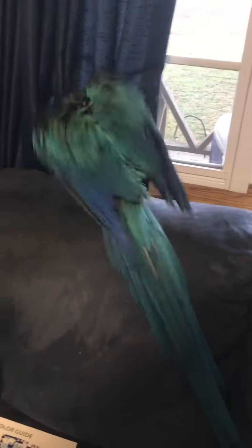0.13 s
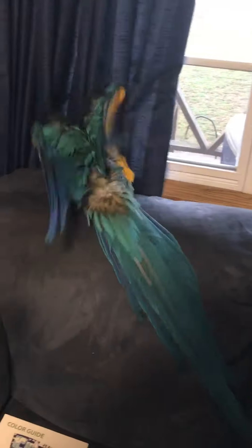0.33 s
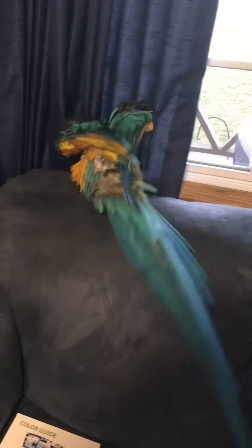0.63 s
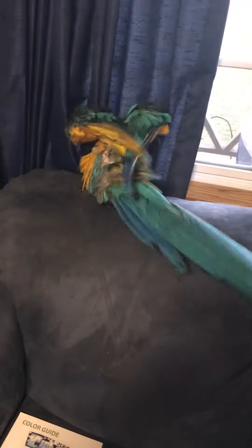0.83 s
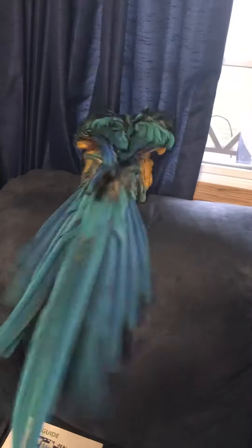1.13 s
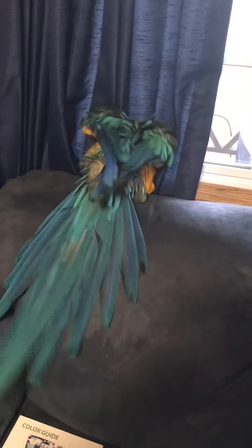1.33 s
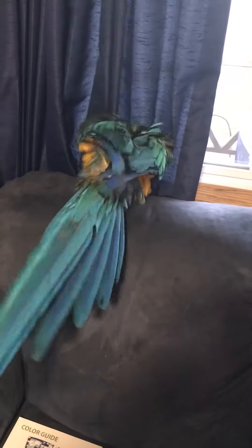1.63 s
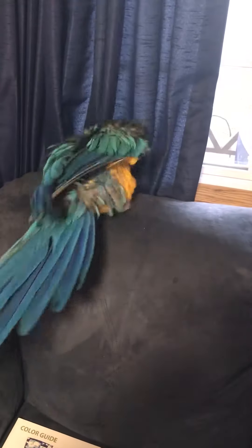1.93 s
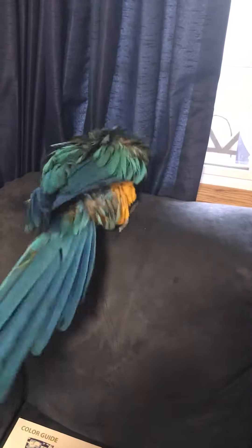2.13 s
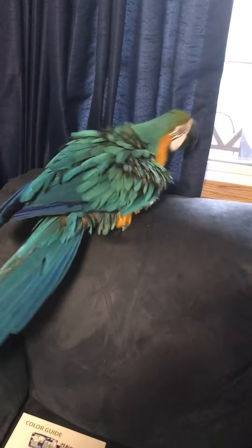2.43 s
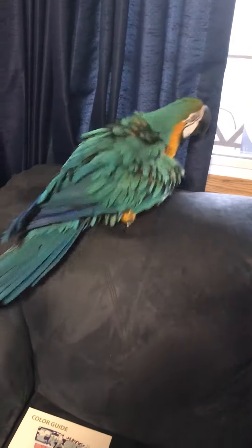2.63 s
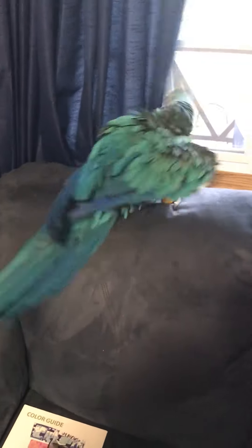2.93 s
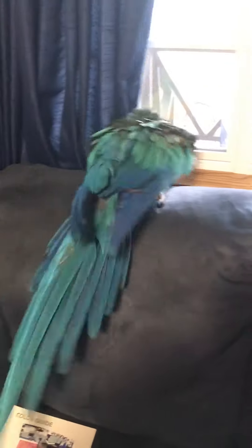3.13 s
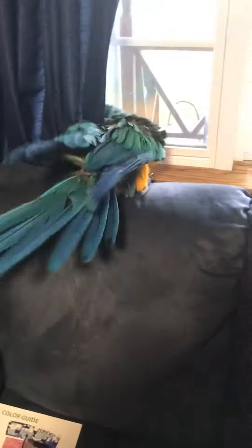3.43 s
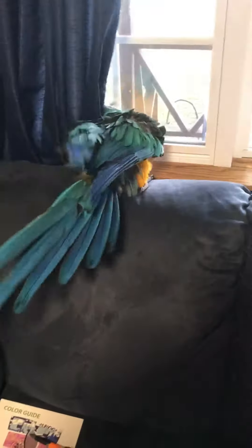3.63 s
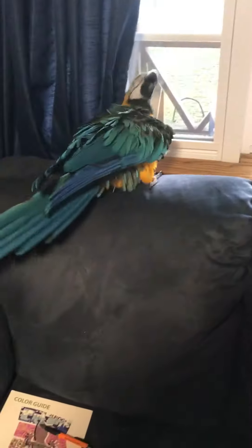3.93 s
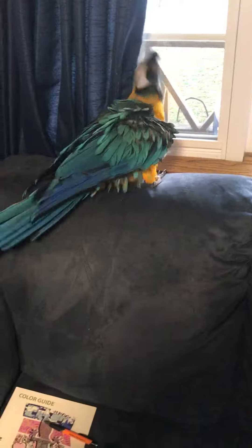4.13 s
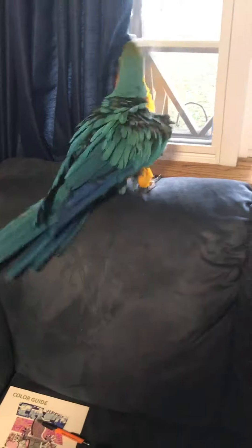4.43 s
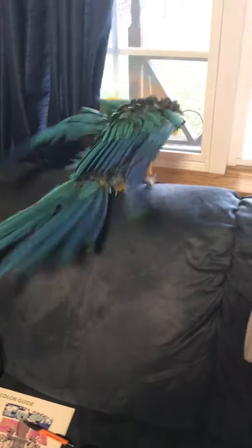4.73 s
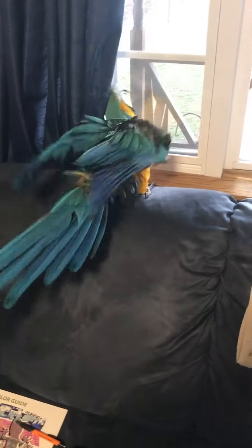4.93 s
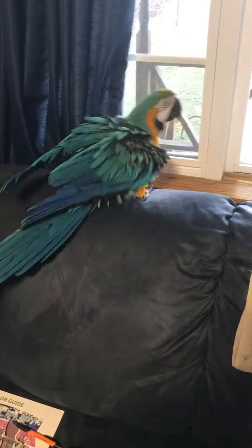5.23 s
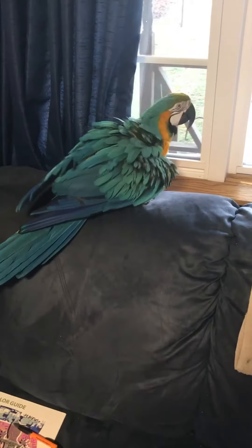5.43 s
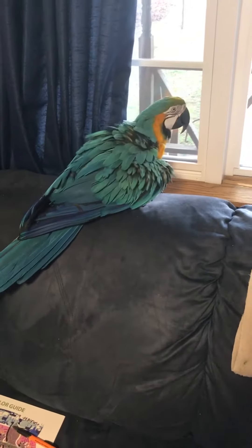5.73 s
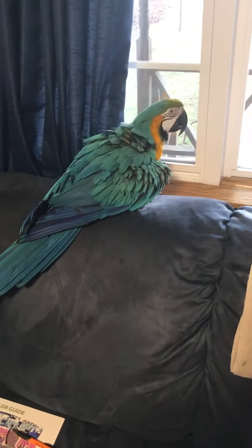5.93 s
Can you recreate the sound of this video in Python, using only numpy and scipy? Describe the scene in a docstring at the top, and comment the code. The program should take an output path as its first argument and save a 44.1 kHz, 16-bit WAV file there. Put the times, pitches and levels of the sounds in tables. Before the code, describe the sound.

A large parrot croaks harshly twice, rustles its feathers, croaks briefly again, and knocks hard on a leather sofa in a quiet living room.

```python
"""A large parrot croaks harshly, twice early and once later, over low room hush and brushing feathers.
It shuffles along the back of a leather sofa in a quiet living room, near a phone.
Hush and feathers are shaped noise; the croak is rough pulses and puffs sent through moving resonances.
Feet, beak and claws knock on the sofa as bursts of decaying modes; soft echoes follow voice and knocks."""
import sys
import numpy as np
from scipy import signal
from scipy.io import wavfile
from scipy.ndimage import uniform_filter1d

SR = 44100
rng = np.random.default_rng(int(sys.argv[2]) if len(sys.argv) > 2 else 0)


def store_pcm(level_fs):
    """Save levels as 16-bit WAV."""
    pcm = np.round(np.clip(level_fs, -1, 1) * 32767).astype(np.int16)
    wavfile.write(sys.argv[1], SR, np.atleast_2d(pcm).T)


def gain_from_db(level_db):
    """Turn a decibel level (scalar or array-like) into a linear amplitude factor."""
    decades = np.asarray(level_db, float) / 20
    return 10 ** decades


N = 268833

# Spectrum of the steady hush. Each row: frequency in Hz, relative density in dB per Hz.
HUSH_SPECTRUM = [(20, -9), (49, -1), (116, -14), (200, -14), (280, -18), (420, -19), (600, -22),
                 (1000, -23), (1400, -24), (2000, -26), (5950, -25.5), (7800, -31), (9000, -29.5),
                 (13700, -33), (15700, -36)]
# Spectrum of the brushing. Each row: frequency in Hz, relative density in dB per Hz.
BRUSH_SPECTRUM = [(150, -24), (400, -13), (1000, -8), (2500, -4), (3500, -1), (6300, -1), (7700, -8),
                  (9000, -5), (10500, -9), (12500, -6), (14800, -10), (16000, -13)]
# Strokes of feathers and claws. Each row: peak time in seconds, peak level in dB, time to rise 10 dB
# in seconds, time to fall 10 dB in seconds, brightness (lift of the top treble) in dB.
STROKES = [(0.067, -58.8, 0.105, 0.243, -0.2), (0.191, -49.2, 0.061, 0.342, -2.5),
           (0.295, -44.6, 0.013, 0.028, -3.5), (0.379, -45.3, 0.093, 0.04, -3.0),
           (0.467, -45.5, 0.062, 0.058, 1.3), (0.647, -54.3, 0.081, 0.116, -1.4),
           (0.998, -55.9, 0.079, 0.029, -2.1), (1.054, -51.9, 0.022, 0.084, 1.2),
           (1.126, -44.3, 0.041, 0.058, -1.3), (1.276, -53.9, 0.062, 0.101, -0.7),
           (1.478, -49.9, 0.163, 0.031, -2.1), (1.581, -52.9, 0.057, 0.078, -0.3),
           (1.831, -59.0, 0.119, 0.035, -3.8), (1.959, -58.3, 0.078, 0.05, -0.7),
           (2.022, -60.4, 0.011, 0.138, -1.6), (2.258, -66.9, 0.273, 0.091, -1.2),
           (2.529, -66.1, 0.008, 0.109, -3.8), (2.791, -68.2, 0.037, 0.017, -1.7),
           (2.913, -53.0, 0.031, 0.079, 0.2), (3.048, -50.3, 0.068, 0.088, -0.9),
           (3.144, -54.0, 0.052, 0.106, -2.2), (3.248, -56.2, 0.102, 0.111, -3.0),
           (3.468, -54.5, 0.094, 0.069, -1.9), (3.561, -56.6, 0.067, 0.078, -2.3),
           (3.837, -65.6, 0.198, 0.034, -0.8), (3.936, -62.6, 0.009, 0.037, -5.0),
           (4.061, -60.6, 0.008, 0.22, -8.0), (4.15, -56.0, 0.009, 0.062, -2.7),
           (4.399, -51.2, 0.086, 0.052, -1.2), (4.535, -59.0, 0.103, 0.009, -3.1),
           (4.63, -59.4, 0.1, 0.047, 2.3), (4.759, -52.2, 0.083, 0.092, -1.6),
           (4.867, -59.3, 0.166, 0.019, -1.8), (4.975, -59.5, 0.111, 0.021, 0.1)]
# Gestures of the three calls, one list per call. Each row: time in seconds, effort in dB,
# pitch in Hz, windpipe resonance in Hz, beak opening from 0 to 1.
CALL_SHAPES = [
    [(.016, -66, 289, 920, 0), (.028, -62.5, 298.6, 930, 0), (.043, -50, 310, 950, 0.55),
     (.048, -44, 318.3, 957, 0.66), (.068, -39.5, 311, 904, 0.85), (.08, -45, 402, 890, 0.75),
     (.102, -44.5, 407, 890, 0.6), (.128, -52, 400, 930, 0.7), (.155, -81, 352, 910, 0.9)],
    [(.165, -57, 400.7, 1055, 0.97), (.177, -44, 405.2, 1050, 0.56), (.187, -37.5, 415, 980, 0.53),
     (.2, -34.5, 400.7, 1130, 0.46), (.222, -36, 407.6, 1080, 0.57), (.245, -40, 387.2, 950, 0.53),
     (.266, -34.5, 387.8, 970, 0.51), (.28, -38.5, 400, 1090, 0.62), (.302, -37, 435, 970, 0.15),
     (.328, -40.5, 395.4, 884, 0.44), (.336, -40.5, 287.3, 990, 0.53), (.375, -48, 282.7, 895, 0.55),
     (.388, -51.5, 277.2, 810, 0.77), (.403, -40, 290, 810, 0.64), (.414, -63, 279, 860, 0.3),
     (.45, -66, 280, 850, 0.1)],
    [(2.919, -40, 245.3, 1070, 0.7), (2.931, -42, 240.6, 1020, 0.89), (2.940, -37, 241, 1150, 0.72),
     (2.952, -40.5, 252.5, 1100, 0.45), (2.96, -54, 288, 1070, 0.75), (2.975, -58, 292, 1100, 0.4)],
]
# Voice of each call. Each row: base level of the fundamental over the windpipe in dB,
# gap from the beak resonance down to its partner in Hz, partner level in dB.
CALL_VOICES = [(8, 585, -3.5), (-1, 500, -2), (6.5, 650, -10.5)]
# The voice breaks up and clears again. Each row: time in seconds, roughness from 0 to 1.
ROUGHNESS = [(.02, .25), (.045, .35), (.055, .65), (.075, .6), (.1, .5), (.18, .5), (.195, .35),
             (.228, .35), (.24, .65), (.26, .62), (.28, .5), (.3, .4), (.328, .4), (.338, .5), (.44, .6),
             (2.92, .7), (2.94, .6), (2.95, .45), (3, .5)]
# The beak resonance glides with the tongue. Each row: time in seconds, resonance in Hz.
BEAK_GLIDE = [(.04, 2450), (.065, 2070), (.088, 2280), (.11, 2130), (.15, 2330), (.17, 2510), (.182, 2440),
              (.195, 2050), (.225, 2150), (.26, 2260), (.31, 2270), (.34, 2120), (.41, 1910), (2.92, 2200),
              (2.935, 2320), (2.942, 2730), (2.955, 2370), (2.98, 2380)]
# Modes of the sofa frame and cushion, before each blow varies them.
# Each row: frequency in Hz, relative level in dB, base time to decay 60 dB in seconds.
SOFA_MODES = [(206, 5.5, 0.041), (243, 1.5, 0.24), (293.6, 7.5, 0.092), (352, -6, 0.14), (394, -5.5, 0.036),
              (457, -2, 0.038), (604.4, -0.5, 0.088), (720, 8, 0.065), (830, 2, 0.067), (950, 5, 0.078),
              (1070, -1, 0.087), (1200, 12.5, 0.019), (1390, 2, 0.05), (1585, -3.5, 0.064),
              (1750, 8.5, 0.017), (2280, 7, 0.019), (2880, 4, 0.027)]
# Deep thump modes of the cushion, before each blow detunes them.
# Each row: frequency in Hz, relative level in dB, time to decay 60 dB in seconds.
CUSHION_MODES = [(64.3, 0, 0.33), (75, 8, 0.16), (116.3, -4.5, 0.61)]
# Soft footfalls. Each row: first touch in seconds, peak of the frame ringing in dB,
# centre of the struck modes in Hz, relative cushion thump in dB, length factor.
FOOTFALLS = [(0.601, -49.5, 243, -21, 0.21), (0.42, -45.5, 200, -3, 0.6), (1.02, -32.5, 294, -10, 0.09),
             (1.027, -47.5, 302, -25, 0.55), (1.143, -35.5, 249, -12, 0.87), (1.63, -47, 190, -3.5, 0.69),
             (1.749, -54, 243, 0.5, 0.36), (1.756, -38, 440, -26, 0.14), (2.185, -52, 190, -9, 0.17),
             (2.508, -42.5, 423, -20, 0.34), (2.919, -33, 214, -12.5, 0.45),
             (3.1878, -18.5, 352, -31, 0.72), (4.8075, -21.5, 400, -15.5, 0.43),
             (4.8140, -20.5, 293, -26, 0.34), (4.83, -40, 390, -24, 0.2), (4.851, -35, 330, -24, 0.3),
             (4.925, -47, 297, -29, 0.41), (4.8354, -39, 436, -35, 0.1)]
# Hard taps of beak and claw. Each row: first touch in seconds, peak of the frame ringing in dB,
# centre of the struck modes in Hz, relative crack in dB, length factor.
TAPS = [(0.657, -50.5, 910, 10, 0.14), (1.550, -51, 1500, 4, 0.3), (1.938, -40, 950, -29, 0.33),
        (2.058, -35.5, 670, -26, 0.097), (2.105, -39.5, 1100, -11, 0.14), (2.489, -54, 700, -21, 1.5),
        (2.527, -49.5, 1200, -15, 0.81), (2.565, -62, 1750, -19, 1.), (3.114, -43.5, 210, -23, 1.1),
        (3.1852, -14.5, 910, -8, 1.23), (3.201, -28, 1000, -28, 2.1), (3.225, -39, 1500, -4, 1),
        (4.142, -47, 600, -1, 0.31), (4.15, -48.5, 520, 6, 0.43), (4.169, -43, 806, -1, 0.11),
        (4.283, -53.5, 1500, 8, .2)]
# A hollow note after some knocks. Each row: start in seconds, level in dB, time to decay 60 dB in seconds.
HOLLOW_NOTES = [(1.15, -45, 0.27), (3.19, -40.5, 1), (4.17, -50, 0.21), (4.821, -67, 0.37)]
# Echo decay of the room. Each row: frequency in Hz, time to decay 60 dB in seconds.
ROOM_DECAY = [(60, 0.6), (160, 0.5), (420, 0.3), (1000, 0.27), (1700, 0.33), (3000, 0.28), (8000, 0.12)]
# Soft furniture soaks up some bands of the echo. Each row: frequency in Hz, relative level in dB.
ROOM_COLOUR = [(60, -11), (160, -0.5), (300, -1), (450, 0), (620, 5), (1000, 0.5), (1700, 1.5), (3000, -6)]


def evened(x):
    """Scales to rms 1."""
    return x / np.sqrt(np.mean(x ** 2) + 1e-20)


def read(points, hz):
    """Reads a spectrum on a log-frequency axis."""
    f, value = np.transpose(points)
    return np.interp(np.log(hz + 1), np.log(f + 1), value)


def add(mix, s, sound):
    """Mixes a sound in at time s."""
    part = mix[round(s * SR):][:len(sound)]
    part += sound[:len(part)]


def wander(length, size):
    """Smooth chance of rms 1 that changes over about size samples."""
    once = uniform_filter1d(rng.standard_normal(length), size)
    return evened(uniform_filter1d(once, size))


def noise(field_db, frame):
    """Random short-time spectra shaped by field_db(hz, t)."""
    frames, hz = 4 * N // frame + 5, np.fft.rfftfreq(frame, 1 / SR)
    a, b = rng.standard_normal((frames, len(hz), 2)).T
    t = np.arange(frames) * frame / 4 / SR
    z = (a + 1j * b) * gain_from_db(field_db(hz[:, None], t))
    return signal.istft(z, nperseg=frame, noverlap=3 * frame // 4)[1][:N]


def resonate(x, hz, width_hz):
    """A steep moving resonance: shifts hz down to zero, smooths twice and shifts back."""
    turn = np.exp(2j * np.pi * np.cumsum(hz * np.ones(len(x))) / SR)
    r = np.exp(-np.pi * width_hz / SR)
    once = signal.lfilter([1 - r], [1, -r], x / turn)
    twice = signal.lfilter([1 - r], [1, -r], once)
    return 2 * (turn * twice).real


def ring(hz, db, t60, rise_cycles):
    """A mode that swells over a cycle or so and dies away."""
    t = np.arange(SR // 2) / SR
    swell = (1 - np.exp(-t * hz / rise_cycles)) ** 2
    return swell * gain_from_db(db - 60 * t / t60) * np.sin(2 * np.pi * hz * t)


def hush():
    """The room's steady air and the microphone's hiss; the bass comes in lumps."""
    lumps_db = 0.6 * wander(N, size=3000)[::512]

    def field(hz, t):
        bass = 1 / (1 + (hz / 200) ** 2)
        return read(HUSH_SPECTRUM, hz) + np.resize(lumps_db, len(t)) * bass

    return gain_from_db(-64) * evened(noise(field, 2048))


def feathers():
    """Brushing hiss that flickers, with tiny crackles where barbs part."""
    s, peak_db, rise_s, fall_s, bright_db = np.transpose(STROKES)[:, :, None]
    clock = np.arange(0, N / SR, .002)
    steps_of_10_db = np.where(clock < s, (s - clock) / rise_s, (clock - s) / fall_s)
    power = gain_from_db(peak_db - 10 * steps_of_10_db) ** 2
    # a faint steady hiss grows in and stays to the end
    settle_s, settle_rise_s, settled_db = 5.02, .1, -64
    settled = gain_from_db(settled_db - 10 * np.maximum(settle_s - clock, 0) / settle_rise_s) ** 2
    total = power.sum(0) + settled
    brightness_db = (power * bright_db).sum(0) / total

    def field(hz, t):
        top = np.clip((hz - 7000) / 1000, 0, 1)
        return read(BRUSH_SPECTRUM, hz) + top * np.interp(t, clock, brightness_db)

    crackle = gain_from_db(1.6 * rng.exponential(1, N)) * (rng.random(N) < 300 / SR)  # about 300 a second
    grain = 1 + 0.42 * signal.lfilter([1], [1, -.97], crackle)
    flicker = gain_from_db(0.88 * wander(N, size=400))
    brush = evened(noise(field, 512)) * evened(grain * flicker)
    return np.interp(np.arange(N) / SR, clock, np.sqrt(total)) * brush


def croak(shape, low_db, gape_hz, partner_db):
    """Uneven pulses and puffs of air pass the windpipe and the half-open beak."""
    s, *columns = np.transpose(shape)
    t = np.arange(s[0], s[-1], 1 / SR)
    effort_db, hz, pipe_hz, opening = (np.interp(t, s, c) for c in columns)
    rough, beak_hz = (np.interp(t, *np.transpose(curve)) for curve in (ROUGHNESS, BEAK_GLIDE))

    # the fundamental sinks as the beak opens and grows as the windpipe note drops
    low_db = low_db - 16 * opening + 18.5 * np.log2(pipe_hz.max() / pipe_hz)
    beak_shut_db, beak_open_db = -34.5, 13.5  # opening makes the beak resonance louder
    beak_db = beak_shut_db + (beak_open_db - beak_shut_db) * opening

    turns = np.cumsum(hz * (1 + 0.078 * rough * wander(len(t), size=90))) / SR
    # the membranes flap unsteadily around 120 Hz, deeper as the voice roughens
    flap_hz = 120 * (1 + .25 * wander(len(t), size=300))
    flap = np.cos(2 * np.pi * np.cumsum(flap_hz) / SR)
    rattle = gain_from_db(rough * (8 * flap + 3 * wander(len(t), size=120)))
    # for a moment every other pulse is weak
    half_s, half_lasts_s, half_share = 0.257, 0.034, 0.49
    half_swell = np.exp(-((t - half_s) / half_lasts_s) ** 2)
    halves = 1 + half_share * half_swell * np.cos(np.pi * turns)
    pulses = halves * sum(np.cos(2 * np.pi * k * turns) for k in range(1, 14))
    puffs = (2.0 + np.exp(-(turns % 1) / 1.8)) * rng.standard_normal(len(t))
    drive = rattle * ((1 - rough) * evened(pulses) + 1.5 * rough * evened(puffs))

    fundamental = evened(resonate(drive, hz, 276))
    windpipe = evened(resonate(drive, pipe_hz, width_hz=270))
    partner = gain_from_db(partner_db) * resonate(drive, beak_hz - gape_hz, width_hz=300)
    beak = evened(resonate(drive, beak_hz, width_hz=300) - partner)
    rasp = evened(resonate(drive, 2130, width_hz=1180))  # broad, around the beak resonance
    # a high resonance flares once, at the hardest push of the long call
    top_s, top_lasts_s = .272, 0.044
    flare = np.exp(-((t - top_s) / top_lasts_s) ** 2)
    top = flare * evened(resonate(drive, 3300, width_hz=340))

    voice = gain_from_db(low_db) * fundamental
    voice += gain_from_db(-8 * opening ** 4) * windpipe  # a wide beak thins the windpipe note
    voice -= gain_from_db(beak_db) * beak
    voice += gain_from_db(beak_db - 6.5) * rasp
    voice += gain_from_db(-11.5) * top
    return s[0], gain_from_db(effort_db) * voice * signal.windows.tukey(len(t), .05)


def knock(peak_db, centre_hz, spread_db, crack_db, thump_db, length, rise_cycles):
    """A blow rings the frame modes near its centre and the cushion below, with a crack at full contact."""
    chance = rng.standard_normal(1000)
    hz, db, t60 = np.transpose(SOFA_MODES)[:, :, None]
    struck_db = db - spread_db * abs(np.log2(hz / centre_hz))  # falls for each octave off the centre
    decay_factor = length * (300 / centre_hz) ** .7  # hard, high knocks die sooner
    # low modes start in phase; higher ones take a random sign
    sign = np.where(hz < 370, 1, np.sign(chance[-len(hz):, None]))
    detuned_hz = hz * (1 + 0.02 * chance[:len(hz), None])
    body = (sign * ring(detuned_hz, struck_db, t60 * decay_factor, rise_cycles)).sum(0)
    # then the contact on the leather damps the ringing
    grip_s, grip_ramp_s, grip_db = 0.014, 0.004, -11
    gripped = np.clip((np.arange(len(body)) / SR - grip_s) / grip_ramp_s, 0, 1)
    body = body * gain_from_db(grip_db * gripped)

    thump = sum(ring(f * (1 + 0.233 * c), level_db, decay, 0.47)
                for (f, level_db, decay), c in zip(CUSHION_MODES, chance[500:]))
    crack_fade = gain_from_db(-60 * np.arange(len(chance)) / SR / .016)
    crack = resonate(chance * crack_fade, 4300, width_hz=4500)
    sound = body / abs(body).max() + gain_from_db(thump_db) * thump
    add(sound, 0, gain_from_db(crack_db) * crack / abs(crack).max())
    return gain_from_db(peak_db) * sound


def footfall(peak_db, centre_hz, thump_db, length):
    """A soft foot swells slowly, rings a narrow group of modes and cracks little."""
    return knock(peak_db, centre_hz, 12, -22, thump_db, length, rise_cycles=0.65)


def tap(peak_db, centre_hz, crack_db, length):
    """A hard beak or claw swells fast and rings a wide spread of modes."""
    return knock(peak_db, centre_hz, 2.5, crack_db, -26.5, length, rise_cycles=0.38)


def hollow_note(db, t60):
    """A single low mode rings at 155 Hz."""
    return ring(155, db, t60, 0.53)


def room(x):
    """Sparse taps of random sign, each band dying at its own speed."""
    taps = np.zeros((3, SR))
    at = np.arange(150, SR - 20, 20) + rng.integers(0, 20, (3, (SR - 151) // 20))
    np.put_along_axis(taps, at, rng.choice([-1., 1.], at.shape), 1)
    hz, t, z = signal.stft(taps, SR, nperseg=512)
    tail_db = read(ROOM_COLOUR, hz)[:, None] - 60 * t / read(ROOM_DECAY, hz)[:, None]
    tail = signal.istft(z * gain_from_db(tail_db), SR, nperseg=512)[1]
    # the sound turns among three random tails, so no single tail's ringing stands out,
    # half a turn in shift_s
    shift_s = .03
    turn = np.pi * (np.arange(N) / SR / shift_s + np.arange(3)[:, None] / 3)
    sent = x * np.sqrt(2 / 3) * np.cos(turn)
    heard = signal.fftconvolve(sent, tail / np.linalg.norm(tail[0]), axes=1)
    return heard.sum(0)[:N]


def scene():
    """Voice and knocks with their room, over feathers, hush and hollow notes."""
    voice, sofa = np.zeros(N), np.zeros(N)
    steady = hush() + feathers()
    for shape, traits in zip(CALL_SHAPES, CALL_VOICES):
        add(voice, *croak(shape, *traits))
    contact_s = .002  # from first touch to full contact
    for s, *blow in FOOTFALLS:
        add(sofa, s + contact_s, footfall(*blow))
    for s, *blow in TAPS:
        add(sofa, s + contact_s, tap(*blow))
    for s, db, t60 in HOLLOW_NOTES:
        add(steady, s, hollow_note(db, t60))
    wet = room(gain_from_db(-12) * voice + gain_from_db(-11.5) * sofa)
    return (voice + sofa + wet + steady)[None]


def low_pass(x):
    """Removes everything above the highest recorded frequency."""
    return signal.sosfilt(signal.butter(12, 15810, fs=SR, output="sos"), x)


def record(dry):
    """A phone microphone drops the deepest bass, below about 45 Hz."""
    low_cut = signal.butter(2, 45, "high", fs=SR, output="sos")
    heard = signal.sosfilt(low_cut, dry)
    return low_pass(heard)


dry = scene()
out = record(dry)
store_pcm(out)
```